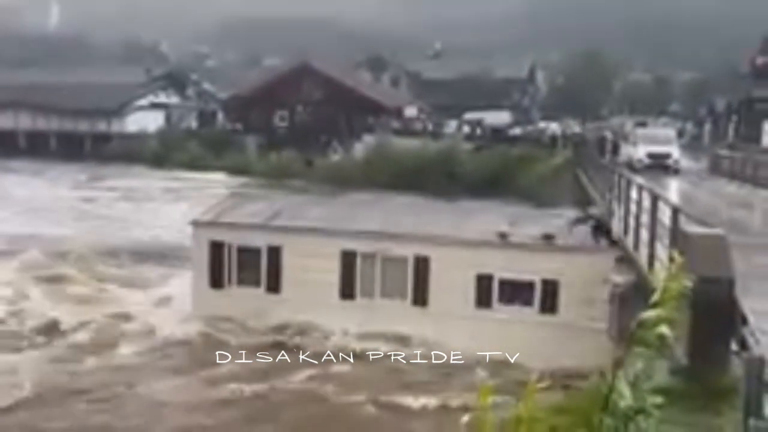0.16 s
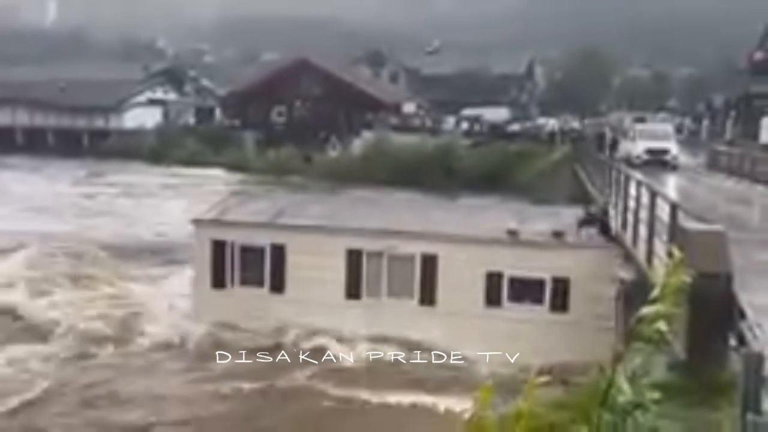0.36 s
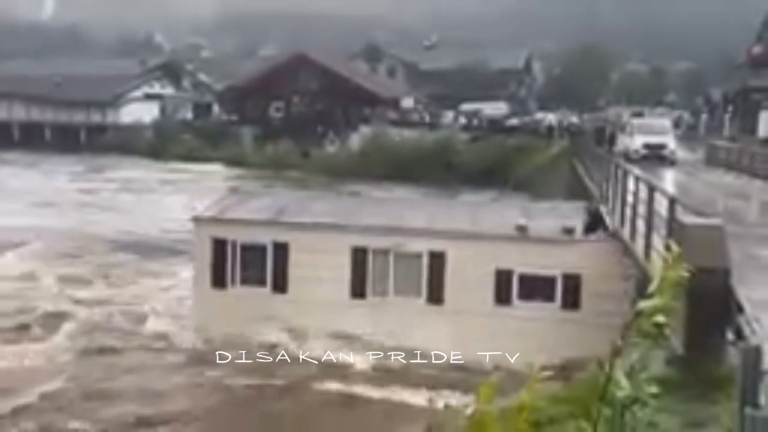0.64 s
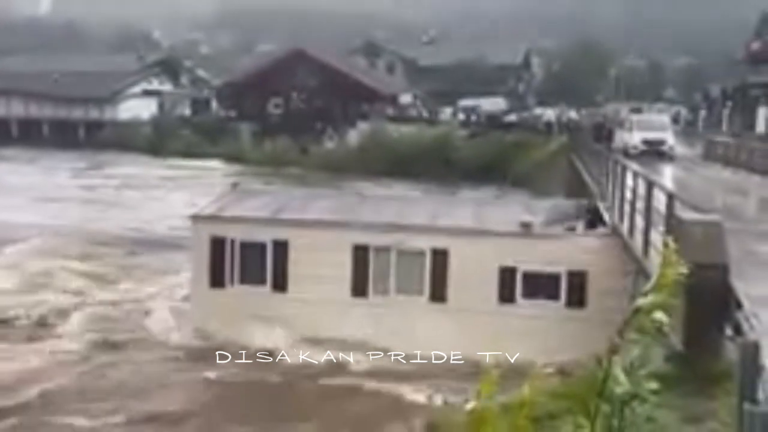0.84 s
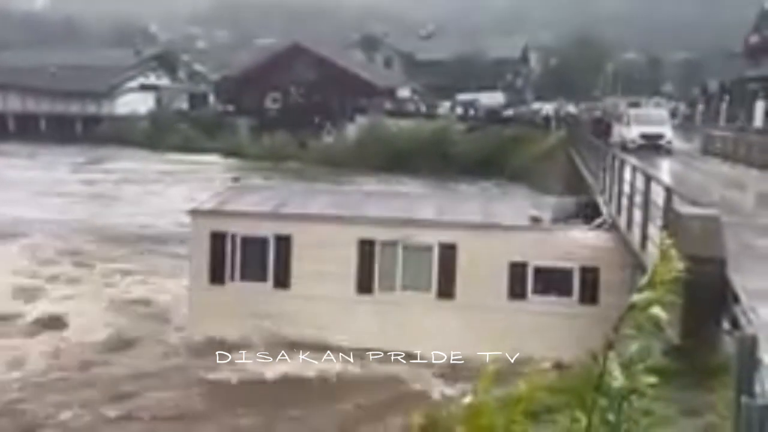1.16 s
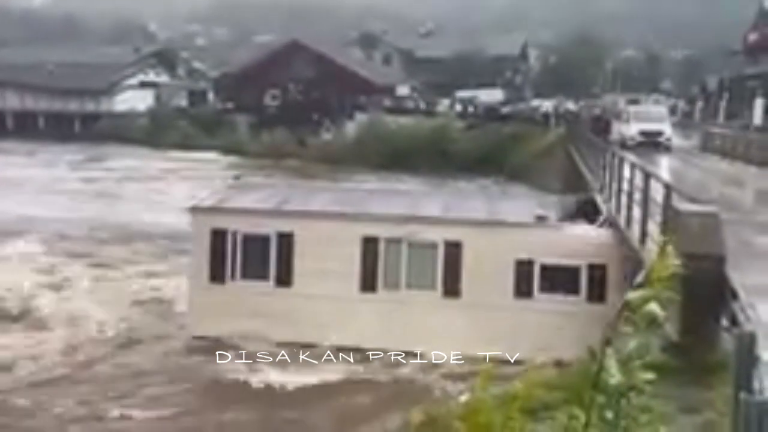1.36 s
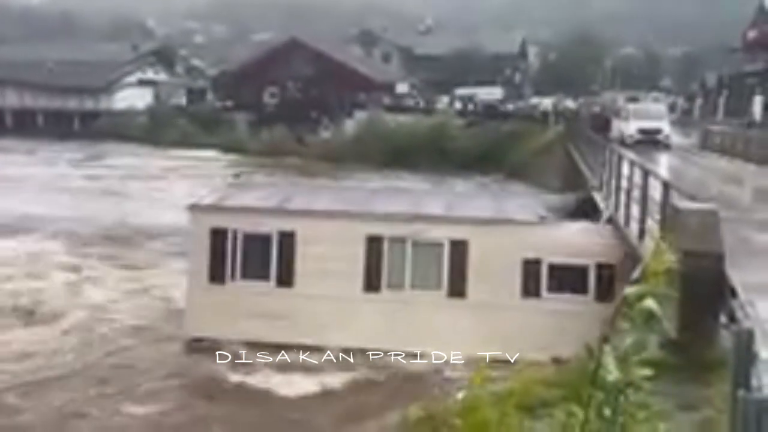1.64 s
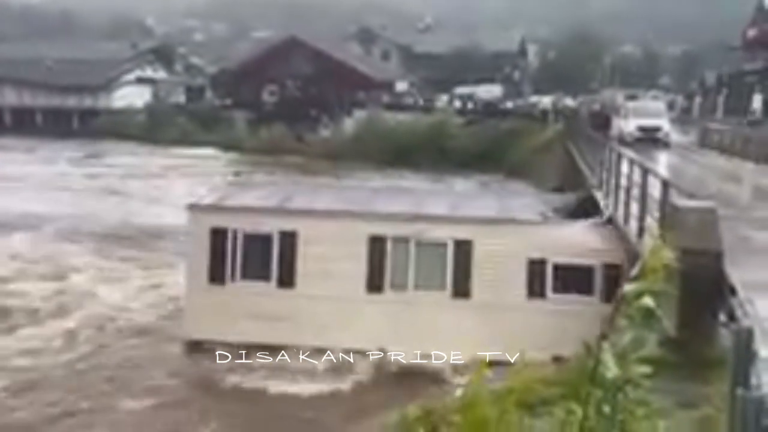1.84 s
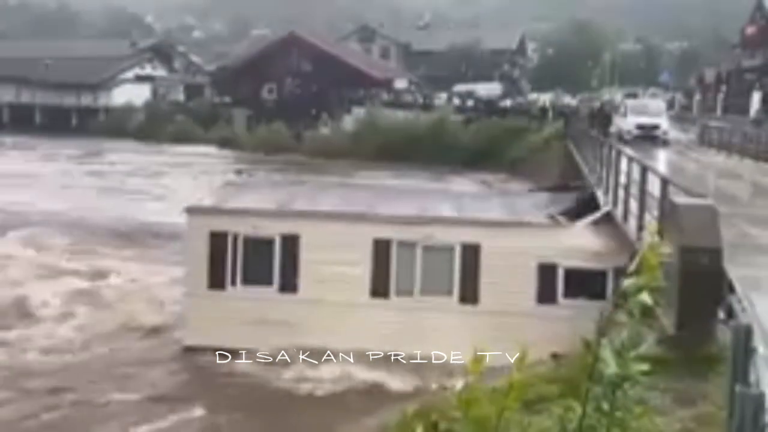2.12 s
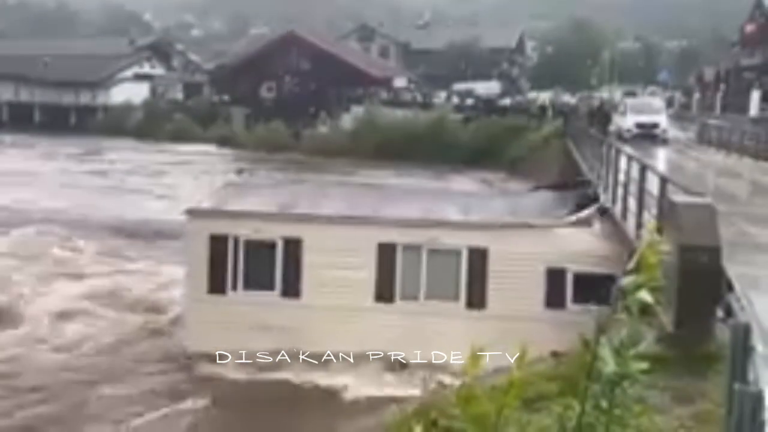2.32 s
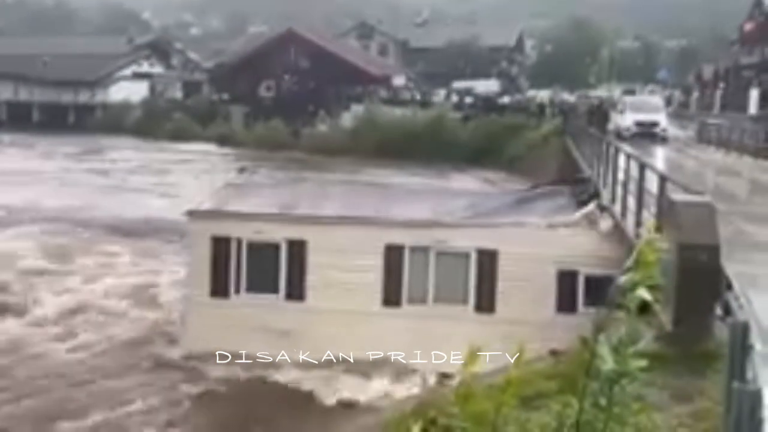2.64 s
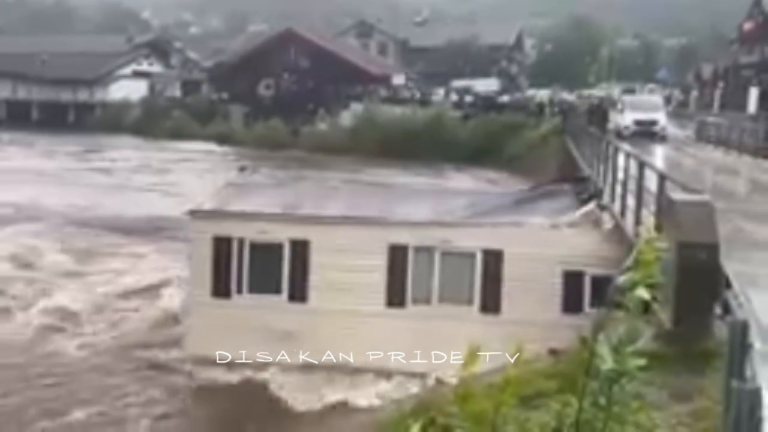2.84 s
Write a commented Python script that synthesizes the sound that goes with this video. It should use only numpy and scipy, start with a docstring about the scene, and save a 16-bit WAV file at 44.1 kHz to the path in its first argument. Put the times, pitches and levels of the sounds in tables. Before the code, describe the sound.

A mobile home crumples against a bridge in a flooded river: constant crunching and crackling, sharp snaps and dull knocks, over low rumbling water and soft hollow thumps, outdoors through a small, hollow-sounding microphone.

```python
"""On the bank of a river in flood, where the current drives a mobile home against a bridge.
The water is shaped noise that rumbles, churns and hisses; waves thump the hollow hull in soft, sagging booms.
The cabin's thin wall and roof crumple in surges of tiny damped rings and patchy noise, under sharper snaps
and a few dull knocks of resonant noise, all with short echoes.
One small microphone hears it, with a hollow, uneven treble."""
import sys
import numpy as np
from scipy import signal
from scipy.fft import rfft, irfft, next_fast_len
from scipy.io import wavfile
from scipy.ndimage import uniform_filter1d, map_coordinates

SR = 44100
rng = np.random.default_rng(int(sys.argv[2]) if len(sys.argv) > 2 else 0)


def transcribe(signal):
    """Save signal, clipped to [-1, 1], as a 16-bit WAV file at the path in sys.argv[1]."""
    frames = np.atleast_2d(signal).T
    limited = np.clip(frames, -1, 1)
    pcm = np.round(limited * 32767).astype(np.int16)
    wavfile.write(sys.argv[1], SR, pcm)


N = 131418

# Loudness of the current's deep rumble, its churning waves and their upper, sloshing part.
# Each row: time in seconds, level in dB (before the trim in river()).
RUMBLE_LEVEL = [(0, -46), (.12, -37), (.24, -38.5), (.3, -46), (.35, -42), (.43, -43), (.5, -44), (.6, -40),
                (.68, -39), (.76, -45), (.94, -42), (1.07, -36.5), (1.19, -42), (1.26, -36.5), (1.35, -40),
                (1.44, -35.5), (1.51, -35.5), (1.58, -46), (1.72, -37.5), (1.85, -40.5), (2.0, -42.5),
                (2.2, -47), (2.33, -44.5), (2.65, -43.5), (2.78, -41), (2.89, -47), (2.98, -49)]
CHURN_LEVEL = [(0.0, -41.5), (0.93, -38), (1.52, -40), (1.56, -50), (1.61, -37.5), (1.8, -41), (1.87, -37),
               (1.93, -45), (2.02, -38), (2.41, -42.5), (2.47, -52), (2.51, -39.5), (2.8, -38.5),
               (2.85, -48), (2.89, -37.5), (2.98, -41)]
SLOSH_LEVEL = [(0, -47), (.16, -41), (.25, -42), (.4, -45), (.52, -40.5), (.64, -35), (.78, -41),
               (.89, -35), (.98, -43), (1.03, -35.5), (1.18, -43.5), (1.24, -37), (1.4, -40), (1.54, -40.5),
               (1.62, -38), (1.77, -41), (1.9, -42), (2.04, -42.5), (2.2, -43), (2.33, -45), (2.43, -41),
               (2.55, -43.5), (2.7, -42), (2.98, -45)]
# Tone of each water layer. Each row: frequency in Hz, relative gain in dB.
RUMBLE_TONE = [(18, -56), (25, -45), (34, -26), (45, -10), (58, -6.5), (75, -4), (105, -8.5), (140, -12),
               (300, -65)]
CHURN_TONE = [(70, -41), (115, -4), (155, 2), (195, -1.5), (260, -17), (500, -43.5)]
SLOSH_TONE = [(120, -20.5), (185, -3.5), (235, -1), (290, -3), (340, -4), (450, -10), (800, -22),
              (2000, -93)]
SPRAY_TONE = [(300, -3.5), (1100, -5), (2500, -16.5), (5000, -9.5), (7000, -27.5), (12000, -19),
              (15500, -60)]
# Waves thumping and slapping the hollow cabin.
# Each row: time of the crest in seconds, level in dB, pitch at the crest in Hz, length in seconds.
THUMPS = [(.24, -34, 62, 0.1), (.562, -33.5, 235, 0.035), (.598, -30, 68, 0.069), (.745, -35.5, 238, .045),
          (.825, -28.5, 77.5, 0.039), (.855, -34, 235, 0.057), (.895, -29.5, 110, 0.05),
          (.972, -28.3, 77, .065), (1.282, -29.5, 214, 0.03), (1.299, -33.5, 70.6, 0.088),
          (1.581, -35, 308, .035), (1.615, -35.5, 150, .05), (1.767, -29, 92, 0.042),
          (2.415, -37, 340, 0.021), (2.69, -35.5, 157, 0.044), (2.948, -40, 62, 0.07)]
# Dull knocks of the wall on the bridge.
# Each row: start in seconds, level in dB before the fades, pitch in Hz, width as a share of the pitch.
KNOCKS = [(.039, -33.5, 1040, 0.15), (0.063, -33, 900, .2), (.21, -39, 860, .5), (.64, -33, 695, 0.68),
          (.882, -35, 560, .5), (1.513, -34.5, 1370, 0.24), (2.03, -30, 670, 0.44), (2.411, -32, 640, .7),
          (2.444, -32.5, 930, 0.34), (2.708, -32.5, 960, .4)]
# Snaps of the cladding. Each row: start in seconds, level of the ring in dB before the fades, pitch in Hz,
# 60 dB decay in seconds, level of the click over the ring in dB.
SNAPS = [(.1496, -29.5, 4400, .02, -7), (.426, -41, 11500, .012, 0), (.4813, -32, 4200, .025, -15),
         (.5781, -31.5, 4080, .022, -20), (.9892, -31, 3700, .02, -4), (1.111, -37, 3900, .02, -8),
         (1.1528, -27, 4900, .016, -3), (1.214, -37, 5600, .015, -12), (1.3803, -30.5, 3400, .03, -14),
         (1.5708, -29, 3100, .022, -18), (1.6137, -26, 2800, .026, -18), (1.6606, -34, 2760, .022, -18),
         (1.8267, -39, 4000, .03, -8), (2.0837, -31, 2940, .075, -22), (2.2159, -33, 2750, .035, -18),
         (2.2847, -33, 2950, .035, -18)]
# Loudness of the crumpling: low crunch, bright crackle and treble fizz.
# Each row: time in seconds, level in dB (before the trim and surges in crumpling()).
CRUNCH_LEVEL = [(0, -43), (.1, -44.5), (.19, -43.5), (.225, -39.5), (.28, -44), (.4, -43.5), (.49, -40),
                (.58, -44.5), (.66, -37.5), (.74, -42), (.89, -40), (1.1, -43.5), (1.3, -41.5),
                (1.6, -41.5), (1.88, -43.5), (2.04, -43.5), (2.28, -44.5), (2.38, -40), (2.45, -39.5),
                (2.49, -43.5), (2.71, -43.5), (2.82, -46), (2.92, -42), (2.98, -53)]
CRACKLE_LEVEL = [(0, -46), (.12, -47.5), (.19, -44), (.225, -39), (.31, -48.5), (.41, -47), (.48, -44.5),
                 (.55, -45.5), (.66, -40), (.73, -44.5), (.8, -48), (.885, -44.5), (.93, -51.5), (.99, -44),
                 (1.05, -49), (1.3, -46.5), (1.6, -44.5), (1.77, -46), (1.84, -43), (1.92, -45),
                 (1.99, -45), (2.11, -39.5), (2.18, -42.5), (2.3, -43.5), (2.37, -40), (2.45, -41),
                 (2.5, -43), (2.62, -42), (2.7, -40), (2.82, -48.5), (2.91, -41.5), (2.98, -45)]
FIZZ_LEVEL = [(0.0, -66), (0.12, -65), (0.18, -51), (0.28, -58), (0.41, -58), (0.47, -51.5), (0.59, -56),
              (0.65, -52), (0.74, -61), (1.73, -52.5), (1.77, -60), (2.45, -45.5), (2.63, -56),
              (2.68, -42.5), (2.72, -43), (2.79, -53), (2.98, -50.5)]
# Tone of each crumpling layer. Each row: frequency in Hz, relative gain in dB.
CRUNCH_TONE = [(180, -68), (400, 0.5), (600, -2), (800, 0), (1080, 2.5), (1500, -7), (2200, -8),
               (5000, -16.5)]
CRACKLE_TONE = [(600, -36), (1300, -6), (1800, -6.5), (2900, 2), (3800, -3), (4800, -7.5), (5700, -6.5),
                (7200, -11), (11500, -17.5), (15500, -36)]
FIZZ_TONE = [(2500, -8), (4800, 8.5), (7200, 3), (11500, -2), (13000, -4.5), (14000, -13), (15500, -2)]
# Colour of the microphone. Each row: frequency in Hz, gain in dB.
MIC = [(1150, -0.5), (1290, -7), (1400, -11), (1560, 1), (1700, 3), (1940, -6), (2200, 0), (2600, -6),
       (2830, -3.5), (3280, -5.5), (3440, -10.5), (3870, -3.5), (4270, -5.5), (4620, -3), (4950, -6),
       (5350, -6), (5600, -12.5), (5900, -9.5), (7400, -9), (7900, -19), (8400, -28.5), (9100, -33),
       (9750, -10), (10800, -2), (13800, -2), (15500, -26)]

THUMP_SAG = 0.23  # pitch lost from start to end, as a share of the pitch at the crest
KNOCK_RISE_S, KNOCK_T60_S = 0.0012, 0.075
SNAP_RISE_S, CLICK_T60_S = 0.0004, 0.012
SNAP_WIDTH, CRACK_WIDTH = 0.09, 0.39  # ring and broad crack, as shares of the pitch
SNAP_CRACK_DB = -2  # crack against the ring
CLUSTERS_PER_S, CLUSTER_DECAY_S = 44, 0.026  # average rate, time constant
ECHO_DB, ECHO_T60_S = -12, 0.052
TOP_HZ = 15700


def amp(db):
    """Decibels to gain."""
    return 10 ** (np.asarray(db) / 20)


def unit(x):
    """Bring x to rms 1."""
    return x / np.sqrt(np.mean(x ** 2) + 1e-20)


def along(points, hz):
    """Read a tone curve at any frequency, on a log axis."""
    f, db = np.transpose(points)
    return np.interp(np.log(hz + 1), np.log(f + 1), db)


def curve(rows):
    """Draw a level through its timed points, one value per sample."""
    seconds, db = np.transpose(rows)
    return np.interp(np.arange(N) / SR, seconds, db)


def filtered(x, response):
    """Shape x by a gain that depends on frequency."""
    m = next_fast_len(N + SR // 2)
    return irfft(rfft(x, m) * response(np.fft.rfftfreq(m, 1 / SR)), m)[:N]


def coloured(x, tone):
    """Shape x by a tone curve, at rms 1."""
    return unit(filtered(x, lambda hz: amp(along(tone, hz))))


def even(x, seconds):
    """Level out x to about rms 1 in a sliding window of this length."""
    window = np.hanning(int(seconds * SR))
    power = np.abs(signal.fftconvolve(x ** 2, window / window.sum(), "same"))
    return x / np.sqrt(power + 1e-6)


def wobble(rate):
    """A smooth random curve with rate knots a second."""
    return map_coordinates(rng.standard_normal(2048), [np.arange(N) * rate / SR], mode="wrap")


def rush(patchy_db):
    """White noise whose gain varies in random patches of time and frequency, at rms 1."""
    z = signal.stft(rng.standard_normal(N), nperseg=512)[2]
    field = uniform_filter1d(rng.standard_normal(z.shape), size=4, axis=0)
    field = uniform_filter1d(field, size=8, axis=1)
    return unit(signal.istft(z * amp(patchy_db * unit(field)), nperseg=512)[1][:N])


def ring(hz, width):
    """Noise through one resonance, at rms 1; width is a share of the pitch."""
    f = np.fft.rfftfreq(8192, 1 / SR)
    damping = 1j * f * hz * width
    body = damping / (hz * hz - f * f + damping)
    return unit(irfft(body * np.exp(2j * np.pi * rng.random(len(f)))))


def add(out, start, sound, rise, t60):
    """Lay a struck sound into out: a quick rise (time constant) and a 60 dB decay, in seconds."""
    t = np.arange(len(sound)) / SR
    struck = sound * (1 - np.exp(-t / rise)) * np.exp(-np.log(1000) * t / t60)
    part = out[round(start * SR):][:len(t)]
    part += struck[:len(part)]


def water(tone, seconds):
    """Noise in the tone of one water layer, kept level."""
    return even(coloured(rng.standard_normal(N), tone), seconds)


def river():
    """Turbulent water as shaped noise: deep rumble, churning and sloshing waves, an even hiss of spray."""
    rumble = amp(curve(RUMBLE_LEVEL) + 0.6) * water(RUMBLE_TONE, seconds=0.15)
    churn = amp(curve(CHURN_LEVEL)) * water(CHURN_TONE, seconds=0.12)
    slosh = amp(curve(SLOSH_LEVEL) + 1.1) * water(SLOSH_TONE, seconds=0.11)
    spray = amp(-47.5) * coloured(rush(patchy_db=0.0), SPRAY_TONE)
    return rumble + churn + slosh + spray


def thumps():
    """A wave meets the hollow wall: a soft boom that swells, sags in pitch and dies."""
    out, t = np.zeros(N), np.arange(N) / SR
    for crest, db, hz, length in THUMPS:
        u = np.clip((t - crest) / length, -.5, .5)  # place within the thump, 0 at the crest
        swell = np.cos(np.pi * u) ** 2
        cycles = hz * length * (u - THUMP_SAG * u * u / 2) + rng.random()
        out += amp(db) * np.sqrt(2) * swell * np.sin(2 * np.pi * cycles)
    return out


def bridge(x):
    """Scatter from the bridge and the cabin: forty weak echoes, 3 to 63 ms late, that die away."""
    delay, size = rng.random(40) * .06 + .003, rng.standard_normal(40)
    faded = size * np.exp(-np.log(1000) * delay / ECHO_T60_S)
    echoes = np.bincount((delay * SR).astype(int), faded)
    return amp(ECHO_DB) * signal.fftconvolve(x, echoes / np.linalg.norm(echoes))[:N]


def knocks():
    """The hollow wall bumps and buckles against the bridge: a struck resonance, broad and dull."""
    out = np.zeros(N)
    for start, db, hz, width in KNOCKS:
        add(out, start, amp(db) * ring(hz, width), KNOCK_RISE_S, KNOCK_T60_S)
    return out


def snaps():
    """Cladding breaks: a sharp click of white noise with a broad crack and a short, narrower ring."""
    out = np.zeros(N)
    for start, db, hz, t60, click_db in SNAPS:
        crack = amp(SNAP_CRACK_DB) * ring(hz, CRACK_WIDTH)
        add(out, start, amp(db) * (ring(hz, SNAP_WIDTH) + crack), SNAP_RISE_S, t60)
        click = amp(db + click_db) * rng.standard_normal(SR // 20)
        add(out, start, click, SNAP_RISE_S, CLICK_T60_S)
    return out


def bursts():
    """Fractures cluster: a random curve of sudden rises and quick falls, without slow drift, at rms 1."""
    onsets = rng.random(N) < CLUSTERS_PER_S / SR
    level = signal.lfilter([1], [1, -np.exp(-1 / (CLUSTER_DECAY_S * SR))], 1.0 * onsets)
    return unit(level - uniform_filter1d(level, size=SR // 20))


def grains(count, low_hz, high_hz, cycles, spread_db):
    """Tiny fractures, each a ring of random time, pitch and size that fades by e in so many cycles."""
    when, pitch, size, phase = rng.random((count, 4)).T[:, :, None]
    hz = low_hz + (high_hz - low_hz) * pitch
    k = np.arange(400)  # samples in each ring
    size_db = -spread_db * np.log(.02 + size)  # few large, many small
    decay = np.exp(-k / SR * hz / cycles)
    tone = np.sin(2 * np.pi * (hz * k / SR + phase))
    rings = amp(size_db) * decay * tone * np.sqrt(hz)  # the root makes up for shorter high rings
    place = (when * N).astype(int) + k
    return unit(np.bincount(place.ravel(), rings.ravel(), N)[:N])


def crumpling():
    """Panels give way in bursts of tiny fractures: a low crunch, a bright crackle and a fine fizz."""
    clusters, flutter = bursts(), wobble(300)
    low = grains(count=3000, low_hz=301.0, high_hz=2240, cycles=2.56, spread_db=2.0)
    low = low + amp(5.5) * rush(patchy_db=3.5)
    high = grains(count=7000, low_hz=1210, high_hz=7254, cycles=18.0, spread_db=0.5)
    high = high + amp(5) * rush(patchy_db=3.5)
    # each level in dB: drawn curve, trim, then the surges
    crunch_db = curve(CRUNCH_LEVEL) + 1.0 + 1.6 * clusters
    crackle_db = curve(CRACKLE_LEVEL) + 2.56 + 1.29 * clusters + 0.37 * flutter
    fizz_db = curve(FIZZ_LEVEL) + 7.5 + 0.24 * clusters + 0.57 * flutter
    crunch = amp(crunch_db) * even(coloured(low, CRUNCH_TONE), seconds=0.033)
    crackle = amp(crackle_db) * even(coloured(high, CRACKLE_TONE), seconds=0.023)
    fizz = amp(fizz_db) * coloured(rush(patchy_db=2.5), FIZZ_TONE)
    return crunch + crackle + fizz


def scene():
    """The river, its thumps on the hull, and the breaking cabin with its echoes."""
    cabin = crumpling() + snaps() + knocks()
    return (river() + thumps() + cabin + bridge(cabin))[None]


def record(dry):
    """The microphone's uneven colour, with nothing from its top frequency up."""
    return filtered(dry[0], lambda hz: amp(along(MIC, hz)) * (hz < TOP_HZ))[None]


dry = scene()
out = record(dry)
transcribe(out)
```